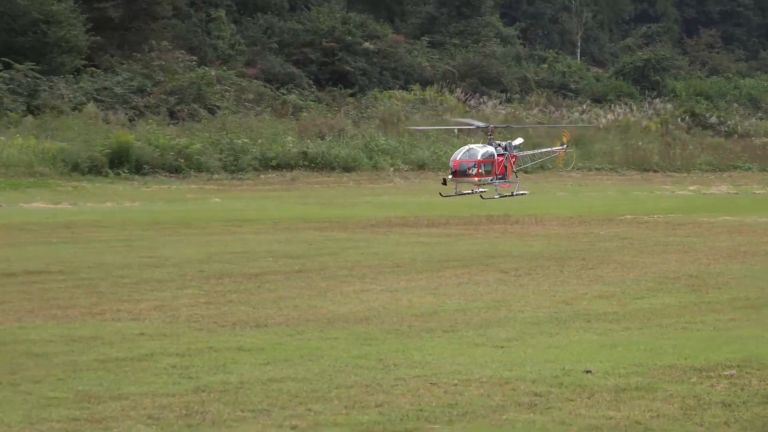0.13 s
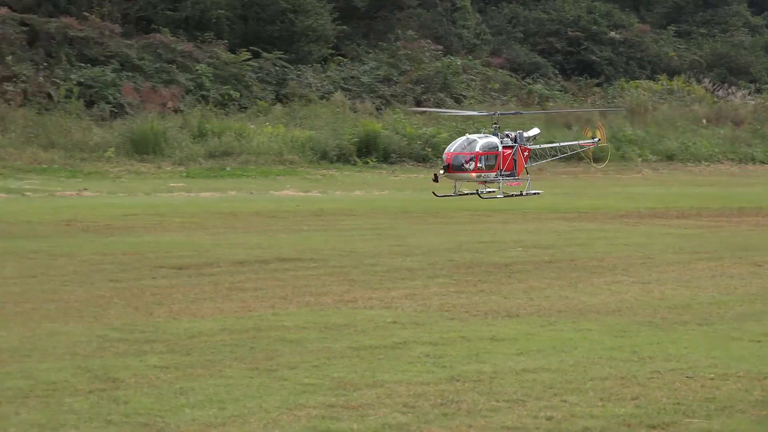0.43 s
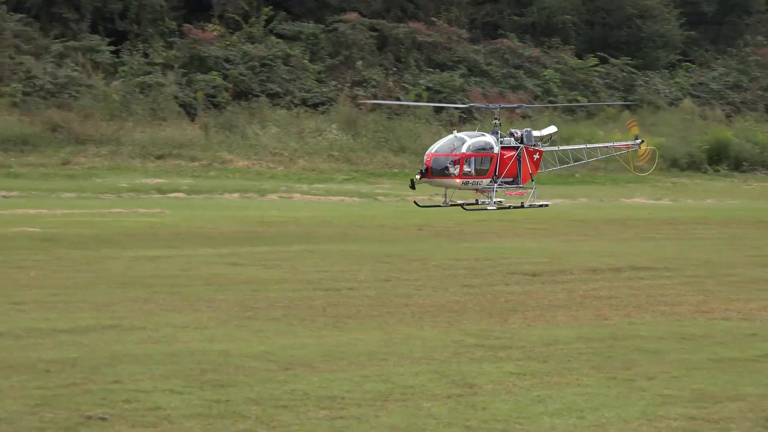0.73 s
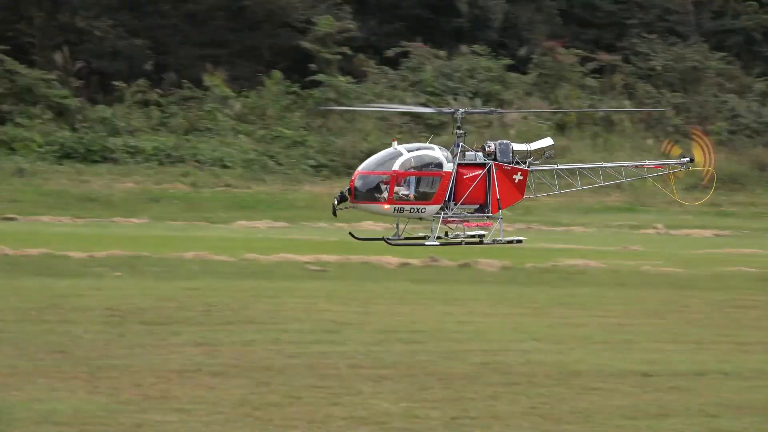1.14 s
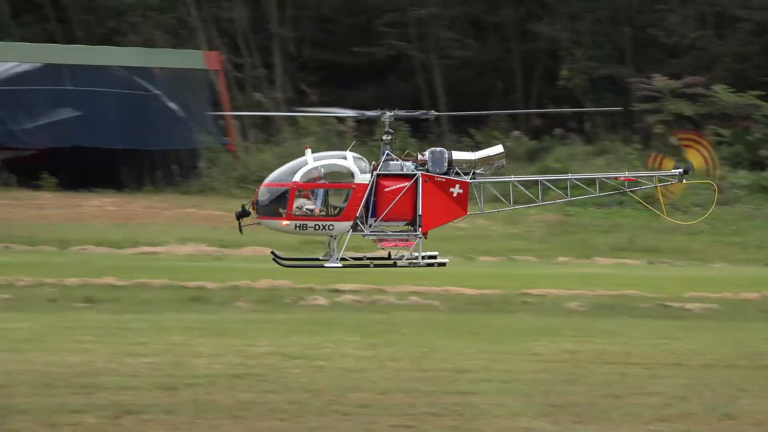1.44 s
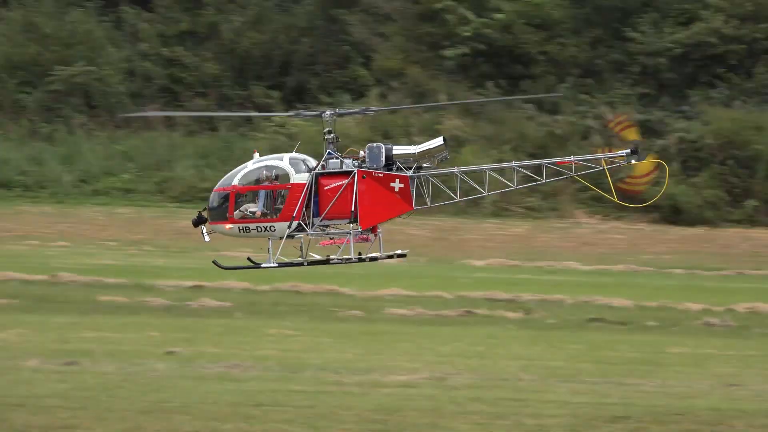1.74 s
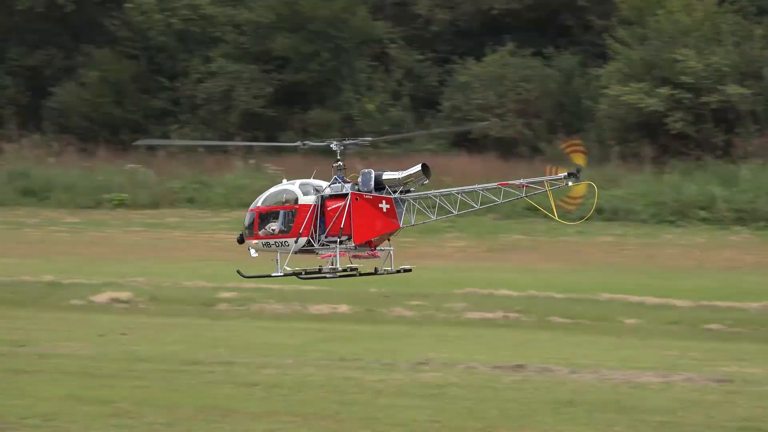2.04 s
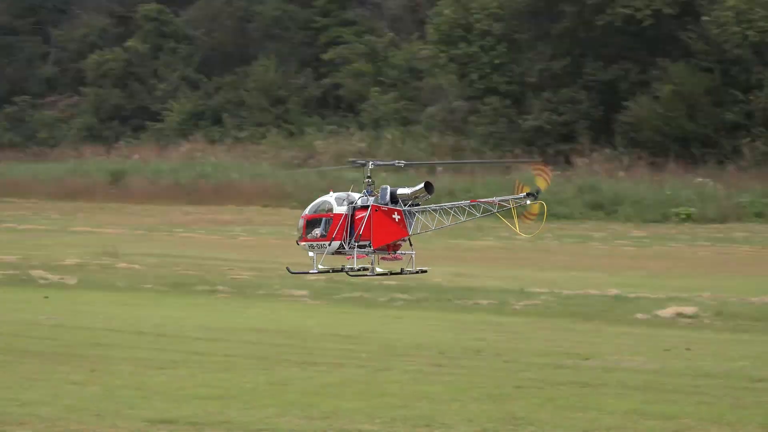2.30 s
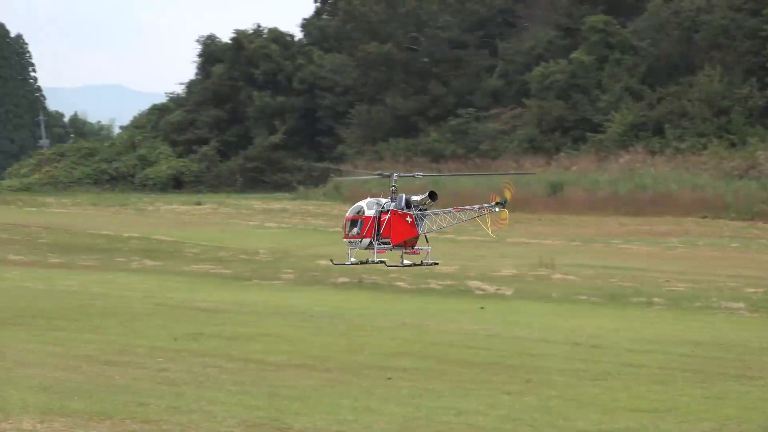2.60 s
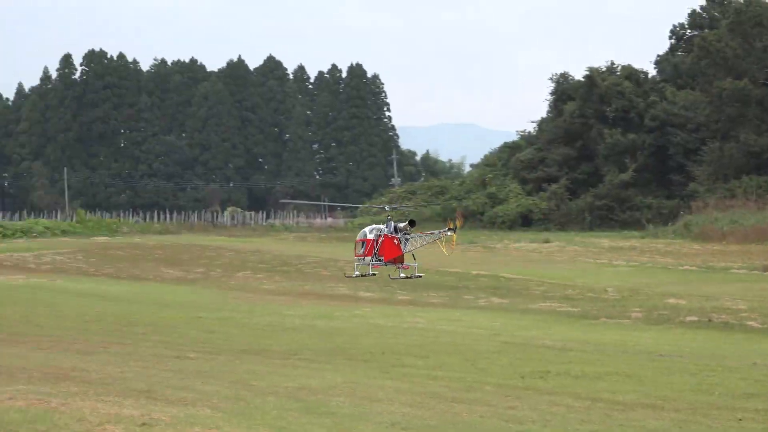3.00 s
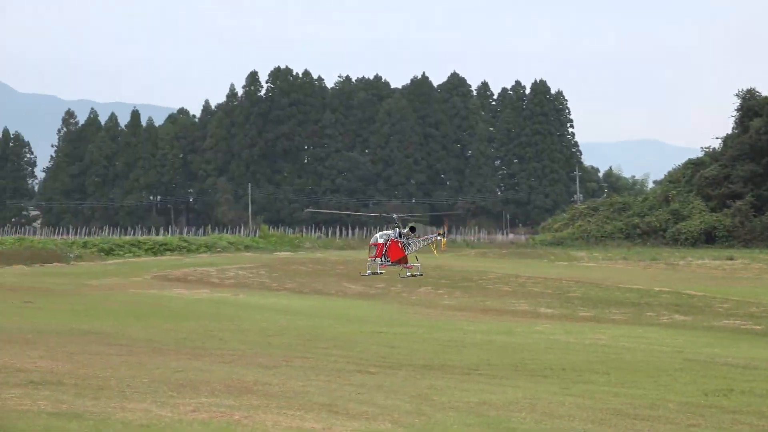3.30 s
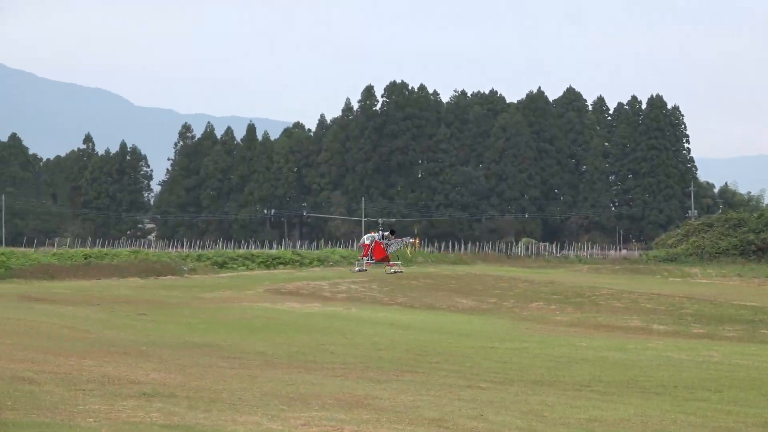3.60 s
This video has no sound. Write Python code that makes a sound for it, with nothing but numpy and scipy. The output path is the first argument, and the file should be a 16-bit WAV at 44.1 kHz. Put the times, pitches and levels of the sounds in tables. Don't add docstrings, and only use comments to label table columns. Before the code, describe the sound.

A large turbine-powered model helicopter passes low over an open grass field, its very high whine and broad roaring rush swelling, dropping slightly in pitch, then fading; camera microphone nearby, almost mono, faint wind.

```python
import sys
import numpy as np
from scipy import signal
from scipy.io import wavfile
from scipy.ndimage import uniform_filter1d

SR = 44100
rng = np.random.default_rng(int(sys.argv[2]) if len(sys.argv) > 2 else 0)


def digitize_waveform(pressure):
    field = np.atleast_2d(pressure).T
    bounded = np.clip(field, -1, 1)
    quanta = np.round(bounded * 32767).astype(np.int16)
    wavfile.write(sys.argv[1], SR, quanta)


def gain_from_decibels(decibels):
    exponent = np.asarray(decibels, float) / 20
    return 10 ** exponent


N = 165375
TIME = np.arange(N) / SR
COARSE = TIME[::64]
REST_HZ = 9870
FRAME, HOP = 1024, 256


def evened(x):
    return x / np.sqrt(np.mean(abs(x) ** 2) + 1e-20)


def read(points, hz):
    f, value = np.transpose(points)
    return np.interp(np.log(hz + 1), np.log(f + 1), value)


def curve(table, t, column=1):
    rows = np.asarray(table, float)
    return np.interp(t, rows[:, 0], rows[:, column])


def drift(t, top_hz):
    f = np.geomspace(.1 * top_hz, top_hz, 16)[:, None]
    waves = np.sin(2 * np.pi * (f * t + rng.random(f.shape)))
    return evened((waves / np.sqrt(f)).sum(0))


def split(x):
    return signal.stft(x, SR, nperseg=FRAME, noverlap=FRAME - HOP)


def join(z):
    return signal.istft(z, SR, nperseg=FRAME, noverlap=FRAME - HOP)[1][..., :N]


# time_s, pitch_hz
WHINE_PITCH = [(0, 10273), (.42, 10272), (.7, 10244), (.95, 10216), (1.2, 10155), (1.4, 10080), (1.6, 9987),
               (1.8, 9867), (2.0, 9759), (2.2, 9676), (2.4, 9611), (2.6, 9567), (2.8, 9537), (3.0, 9520),
               (3.3, 9502), (3.75, 9460)]


def doppler():
    return uniform_filter1d(curve(WHINE_PITCH, TIME), size=4000, mode="nearest") / REST_HZ


SHIFT = doppler()


def facing(t, front, side, rear):
    toward = np.clip((np.interp(t, TIME, SHIFT) - 1) * 25, -1, 1)
    ahead = np.maximum(toward, 0) ** 1.6
    behind = np.maximum(-toward, 0) ** 1.6
    return side + (front - side) * ahead + (rear - side) * behind


def tone(hz, waver_hz):
    tremble = np.interp(TIME, COARSE, drift(COARSE, 60))
    turns = np.cumsum(hz + waver_hz * tremble) / SR
    return np.sqrt(2) * np.sin(2 * np.pi * (turns + rng.random()))


# time_s, level_db
WHINE_LEVEL = [(0, -12), (.4, -13.5), (.54, -12), (.6, -16), (.87, -16.5), (1.08, -12.5), (1.44, -15),
               (1.66, -19.5), (1.71, -14.5), (1.97, -22), (2.2, -18.5), (2.3, -22), (2.46, -16), (2.6, -22),
               (2.76, -21), (2.91, -16), (3.2, -31), (3.65, -25)]
# time_s, depth_db, half_length_s
WHINE_FADES = [(1.19, 4, .025), (1.375, 6, .015), (1.87, 4, .01), (2.015, 10, .022), (2.12, 20, .016),
               (2.36, 6, .012), (2.805, 9, .025), (3.2, 7, .015), (3.455, 12, .03), (3.73, 5, .015),
               (2.05, -5, .012), (2.6, 4, .01)]


def whine():
    flutter_db = facing(COARSE, front=.9, side=1.2, rear=1.7) * drift(COARSE, 45)
    db = curve(WHINE_LEVEL, COARSE) + flutter_db
    for time_s, depth_db, half_s in WHINE_FADES:
        db = db - depth_db * np.exp(-((COARSE - time_s) / half_s) ** 2)
    return gain_from_decibels(np.interp(TIME, COARSE, db)) * tone(REST_HZ * SHIFT, waver_hz=1.6)


# time_s, level_db, brightness_db_per_octave
RUSH = [(0, -16.5, 0), (.3, -16, 0), (.55, -16, 0), (.68, -15.5, -0.5), (.76, -13.5, 0), (1.0, -14.5, -0.5),
        (1.3, -13, -0.5), (1.65, -13, 0), (1.95, -11, .5), (2.2, -11.5, .5), (2.45, -12, 0),
        (2.7, -13.5, -.5), (2.95, -14.5, -1), (3.15, -17, -1), (3.45, -17, -1.5), (3.75, -19.5, -2)]
# frequency_hz, density_db
NOSE = [(25, -23), (170, -10), (450, -0.5), (1200, -5.5), (2500, -8.5), (5000, -4), (9000, 1),
        (15700, -8.5)]
# frequency_hz, density_db
FLANK = [(25, -39), (170, -2.5), (450, 1.5), (1200, 0), (2500, -5.5), (5000, -2.5), (9000, -4.5),
         (15700, -11)]
# frequency_hz, density_db
TAIL = [(25, -33), (170, -5.5), (450, 1), (1200, -3), (2500, -8), (5000, -8), (9000, -5), (15700, -18)]
# frequency_hz, width_hz, front_db, side_db, rear_db
PIPE = [
    (198, 44, 4.5, 0, -0.5),
    (536, 110, -0.5, 4, -2.5),
    (726, 180, -2, -4, -7),
    (1240, 80, 9, 5.5, 6),
    (1920, 100, 3.5, 3, 4.5),
    (8700, 410, -0.5, -3.5, -2.5),
    (11700, 540, 2, 0, 1),
]


def rush_colour(hz, t):
    colour = facing(t, *(read(view, hz) for view in (NOSE, FLANK, TAIL)))
    for centre_hz, width_hz, *db in PIPE:
        colour = colour + facing(t, *db) / (1 + ((hz - centre_hz) / width_hz) ** 2)
    colour = colour + curve(RUSH, t, column=2) * np.log2(np.maximum(hz, 300) / 3000)
    swing_db = 4 * np.exp(-((t - 2.6) / 0.31) ** 2)
    return colour + swing_db / (1 + ((hz - 1320) / 170) ** 2)


def blade_chop():
    blades_hz, abeam_s, span_s, depth = 42.8, 1.5, 0.41, 0.23
    turns = np.cumsum(blades_hz * SHIFT) / SR
    chop = np.cos(2 * np.pi * turns)
    chop = chop + 0.55 * np.cos(4 * np.pi * turns / 3 + 1) + 0.25 * np.cos(2 * np.pi * turns / 3)
    return chop * depth * (0.42 + np.exp(-((TIME - abeam_s) / span_s) ** 2))


def rush():
    hz, t, z = split(rng.standard_normal(N))
    hz = hz[:, None]
    colour = rush_colour(hz, t)
    middle = (hz[:, 0] > 400) & (hz[:, 0] < 9000)
    gain = gain_from_decibels(colour) / np.sqrt((gain_from_decibels(colour[middle]) ** 2).sum(0) / len(hz))
    patches = rng.standard_normal((len(t), len(hz))).T
    patches = uniform_filter1d(patches, size=24, axis=0)
    patches = evened(uniform_filter1d(patches, size=14, axis=1))
    gusts = .55 * drift(t, 20) * np.clip((hz - 6000) / 5000, 0, 1)
    z = z * gain * gain_from_decibels(curve(RUSH, t) - 2.0 + 0.6 * patches + gusts)
    treble = join(z / (1 + (9000 / (hz + 1)) ** 6))
    return join(z) + blade_chop() * treble


# order, front_db, side_db, rear_db
SHAFT = [
    (1, -50, -36, -43),
    (2, -38, -31, -41),
    (3, -39, -41, -42),
    (4, -34, -39, -48),
    (5, -35, -37, -43),
    (7, -43, -42, -52),
    (8, -48, -50, -56),
    (9, -60, -58, -66),
]
# rest_pitch_hz, front_db, side_db, rear_db
GEARS = [(42.4, -60, -58, -60), (84.8, -56, -54, -54), (181, -41, -41, -42), (1001, -47, -27, -44),
         (1993, -51, -47, -52), (2253, -48, -46, -50), (2980, -47, -45, -46), (3538, -44, -42, -51),
         (5792, -43, -43, -51), (6397, -42, -32, -40), (7720, -45, -42, -48), (8044, -46, -42, -44)]


def shaft_and_gear_tones():
    shaft_hz = REST_HZ / 6
    rows = np.array([(shaft_hz * order, *db) for order, *db in SHAFT] + GEARS)
    levels = facing(COARSE, *rows[:, 1:].T[:, :, None])
    out = np.zeros(N)
    for hz, db in zip(rows[:, 0], levels):
        fading_db = min(1 + hz / 2000, 2.6) * drift(COARSE, 12)
        level = gain_from_decibels(np.interp(TIME, COARSE, db + fading_db))
        out += level * tone(hz * SHIFT, waver_hz=.0007 * hz)
    return out


# time_s, lag_ms
ECHO = [(0, .43), (.2, .47), (.46, .51), (.74, .645), (.93, .74), (1.2, .9), (1.45, 1.05), (1.62, 1.18),
        (1.86, 1.23), (2.04, 1.17), (2.23, 1.02), (2.41, .87), (2.55, .76), (2.8, .665), (3.0, .585),
        (3.3, .545), (3.75, .47)]


def ground(x):
    grass_flow, sine_per_ms, share, blur_hz, blur_turns = 100, .34, .86, 4500, 9
    hz, t, z = split(x)
    hz = hz[:, None] + 1
    lag_ms = .99 * curve(ECHO, t) + 0.016 * drift(t, 10)
    ratio = hz / grass_flow
    impedance = 1 + 9.08 * ratio ** -.75 - 11.9j * ratio ** -.73
    turf = impedance * sine_per_ms * lag_ms
    turns = hz * lag_ms / 1000
    echo = np.exp(1j * np.angle((turf - 1) / (turf + 1))) * np.exp(-2j * np.pi * turns)
    blur = np.exp(-(turns / blur_turns) ** 2) / (1 + hz / blur_hz)
    return join(z * (1 + share * echo * blur))


def wind():
    low = signal.butter(2, 35, fs=SR, output="sos")
    rumble = evened(signal.sosfilt(low, rng.standard_normal((2, N))))
    return gain_from_decibels(-54 + 2.5 * drift(TIME, 7.6)) * rumble


# frequency_hz, level_under_mid_db
SPREAD_FRONT = [(100, -46), (1500, -31), (4000, -34), (7000, -16), (15000, -14)]
# frequency_hz, level_under_mid_db
SPREAD_FLANK = [(100, -47), (1500, -27), (4000, -28), (7500, -19), (15000, -16)]
# frequency_hz, level_under_mid_db
SPREAD_REAR = [(100, -34), (1500, -22), (4000, -11), (9000, -12.5), (15000, -15)]


def port_difference(mid):
    hz, t, z = split(mid)
    hz = hz[:, None]
    scatter = rng.standard_normal((len(t), len(hz), 2))
    scatter = scatter[..., 0] + 1j * scatter[..., 1]
    scatter = evened(uniform_filter1d(scatter, size=4, axis=0)).T
    views = (SPREAD_FRONT, SPREAD_FLANK, SPREAD_REAR)
    spread = gain_from_decibels(facing(t, *(read(view, hz) for view in views)))
    lag_us = facing(t, front=2.4, side=1.0, rear=.2)
    lag = -1j * np.pi * hz * lag_us / 790000.0
    duller_left = 0.025 * np.clip(hz / 7000, 0, 1)
    return join(z * (lag + spread * scatter - duller_left))


def scene():
    mid = whine() + ground(rush() + shaft_and_gear_tones())
    side = port_difference(mid)
    return np.array([mid + side, mid - side]) + wind()


def roll_off(x):
    return signal.sosfilt(signal.butter(12, 15870, fs=SR, output="sos"), x)


def record(dry):
    dry = signal.sosfilt(signal.butter(2, 15200, fs=SR, output="sos"), dry)
    knee, ceiling = .62, .86
    room = ceiling - knee
    over = np.maximum(abs(dry) - knee, 0)
    limited = np.sign(dry) * (np.minimum(abs(dry), knee) + room * np.tanh(over / room))
    return roll_off(limited)


dry = scene()
out = record(dry)
digitize_waveform(out)
```